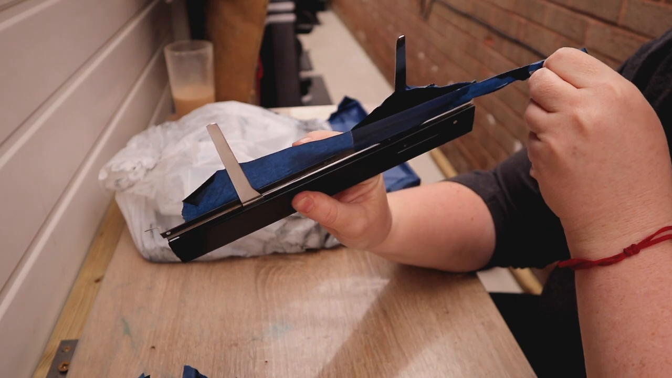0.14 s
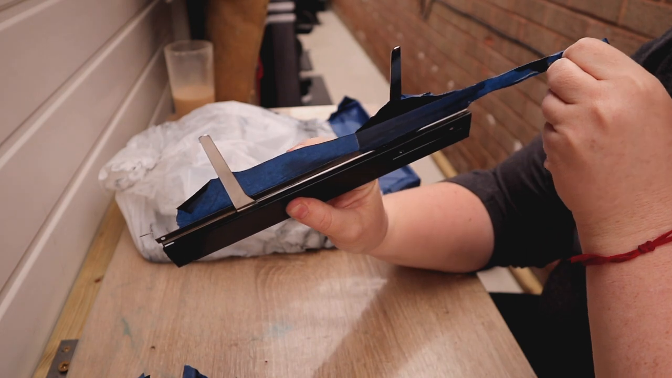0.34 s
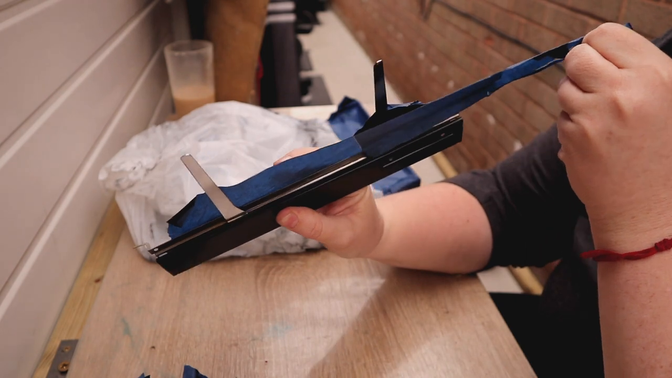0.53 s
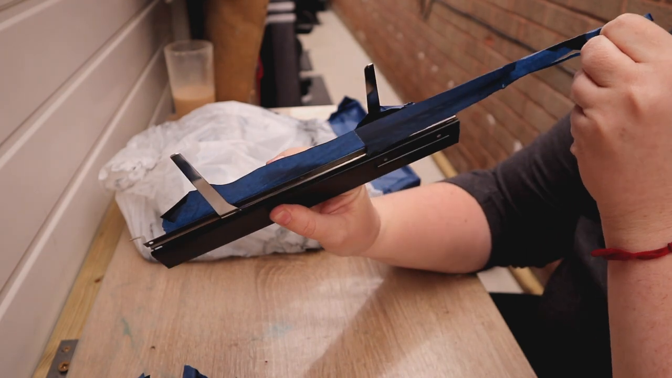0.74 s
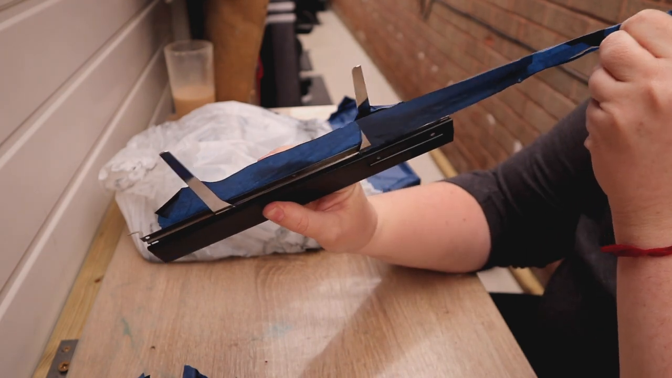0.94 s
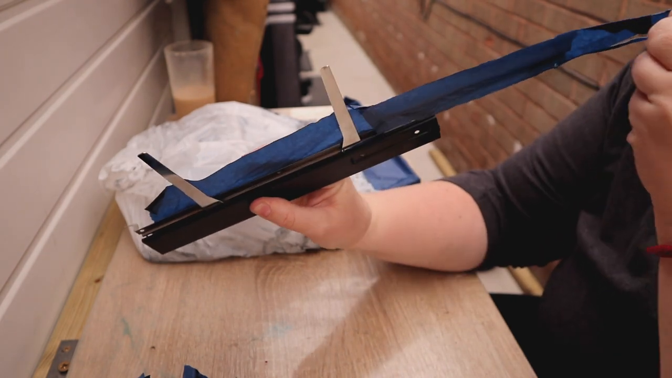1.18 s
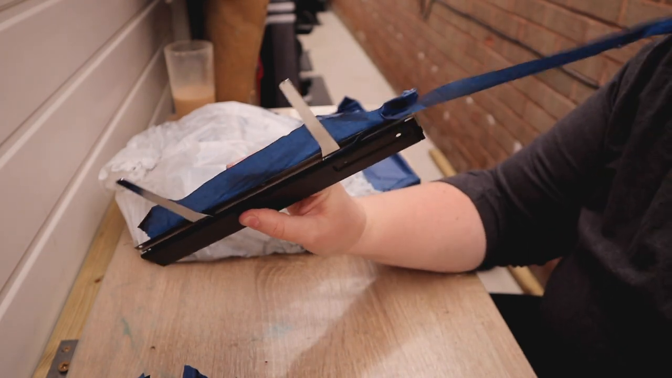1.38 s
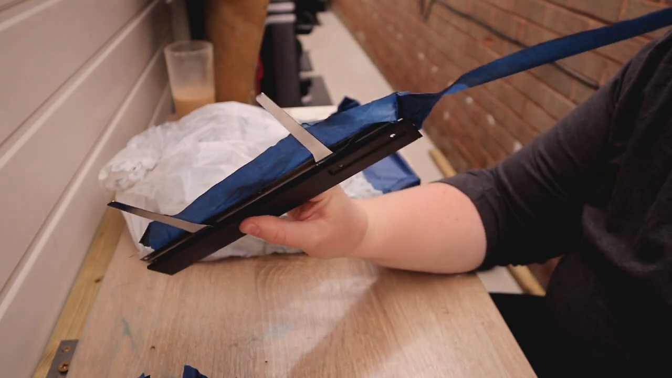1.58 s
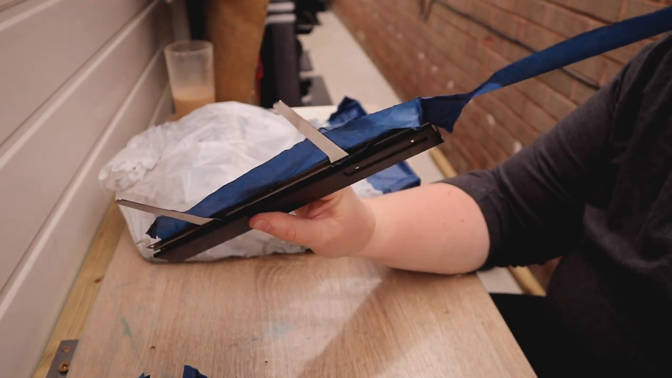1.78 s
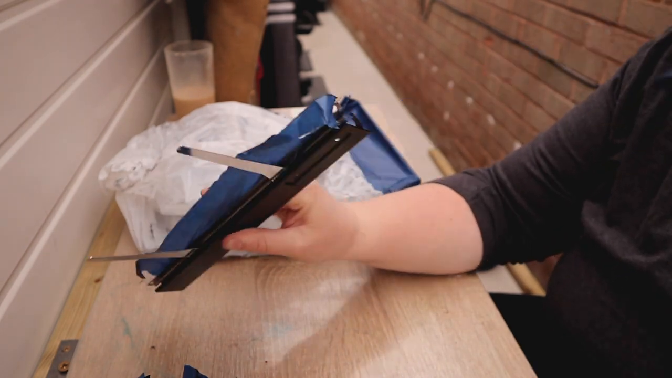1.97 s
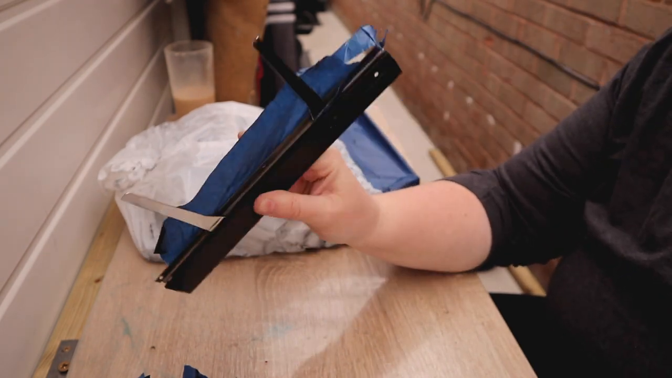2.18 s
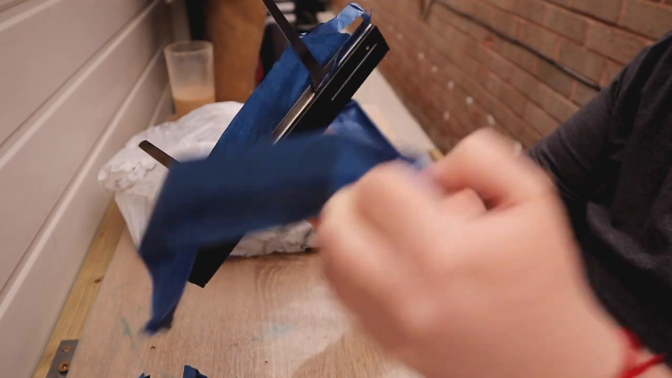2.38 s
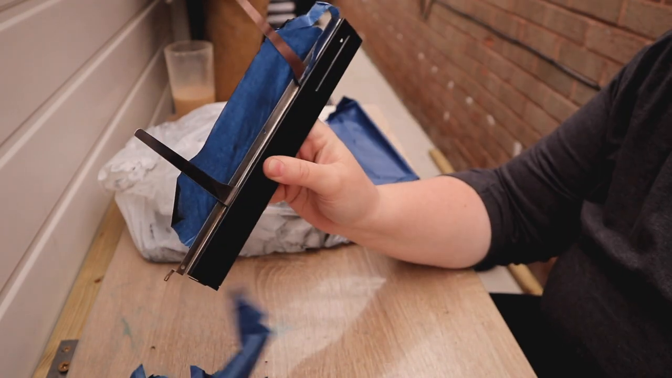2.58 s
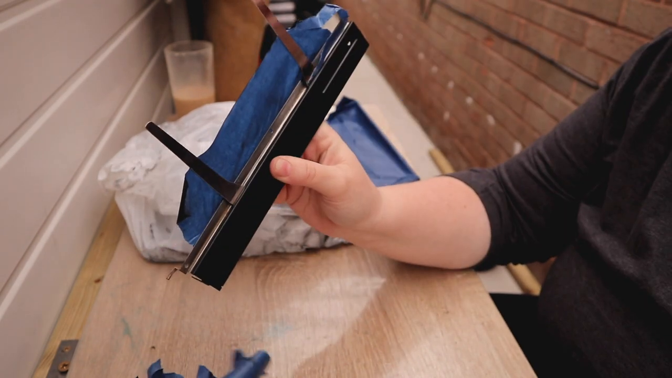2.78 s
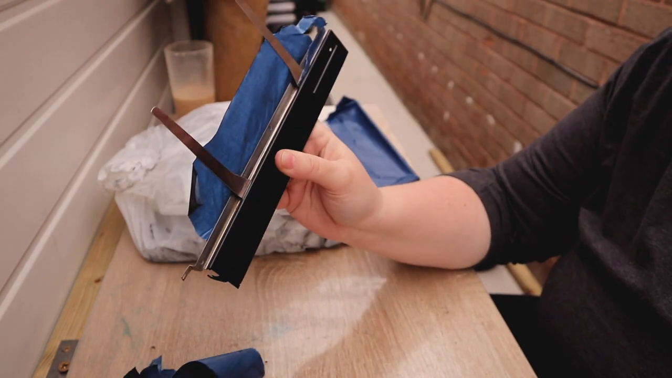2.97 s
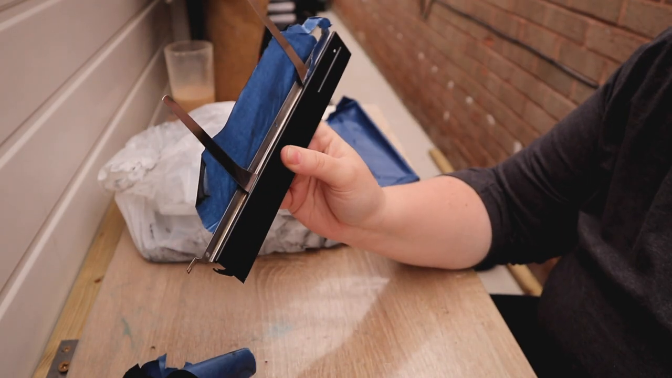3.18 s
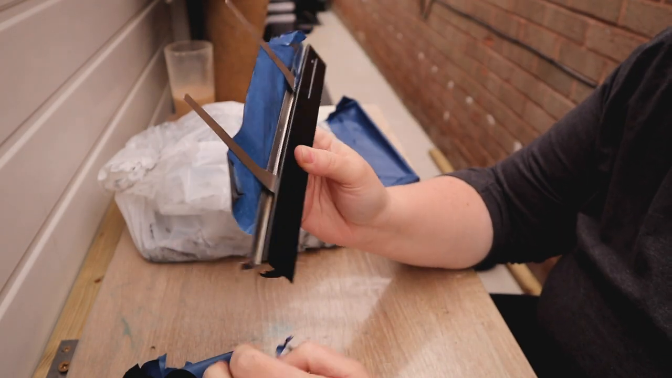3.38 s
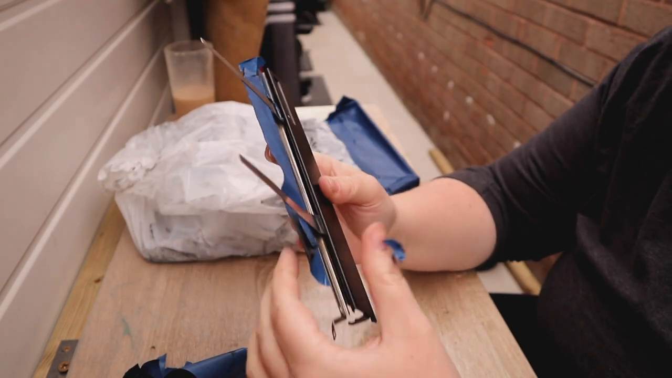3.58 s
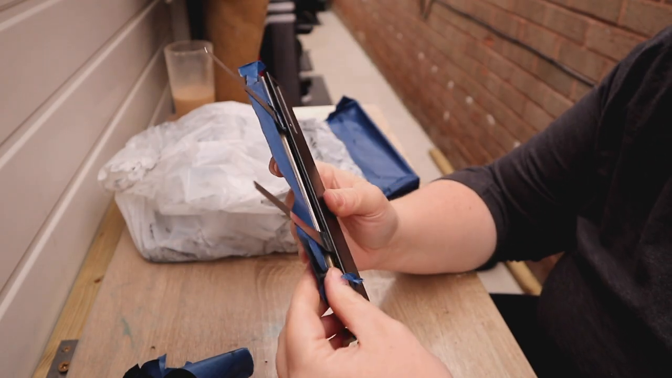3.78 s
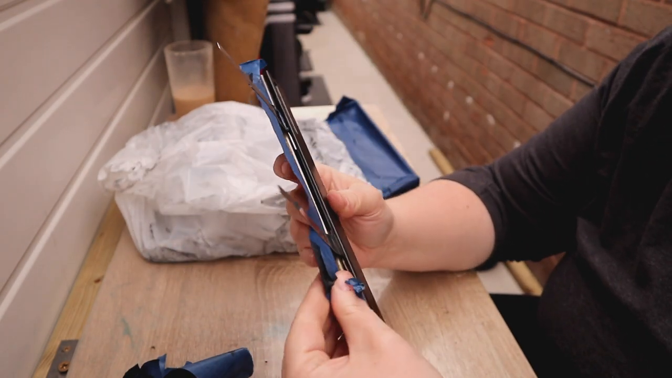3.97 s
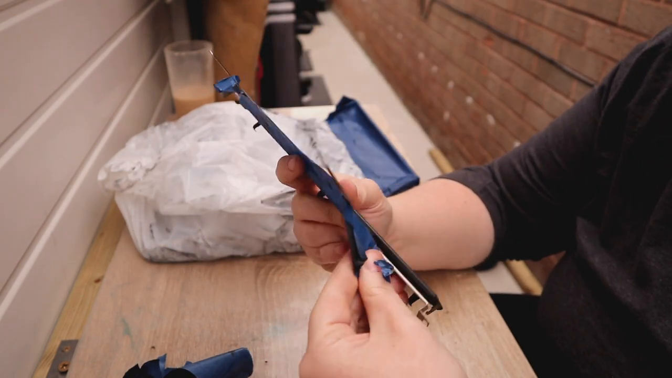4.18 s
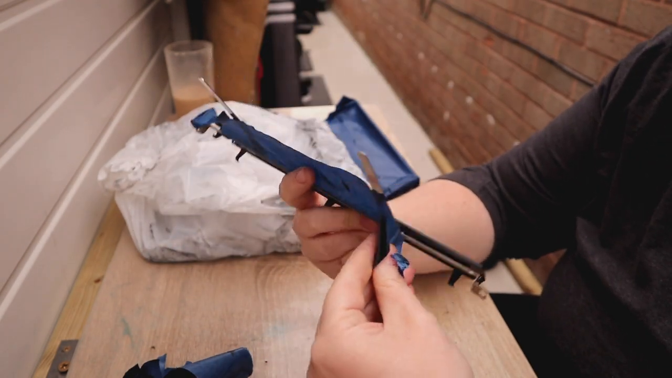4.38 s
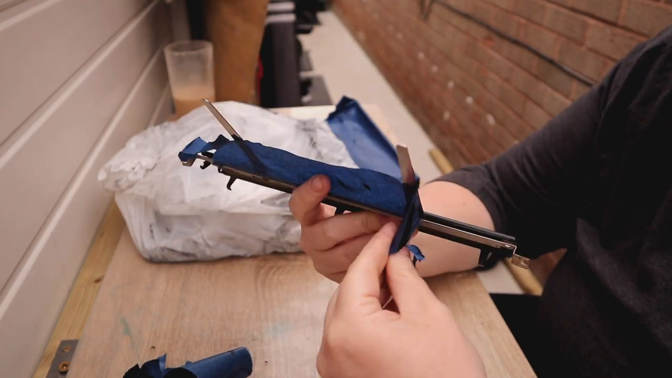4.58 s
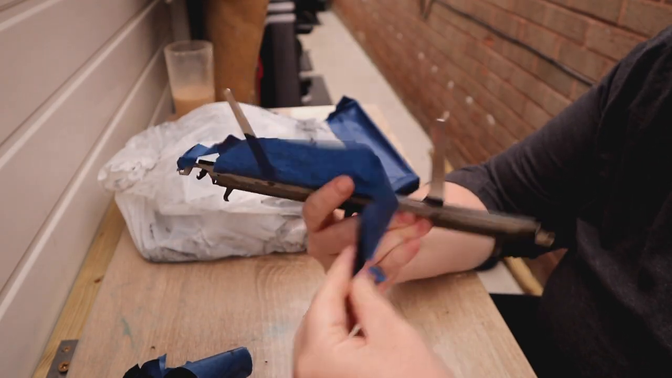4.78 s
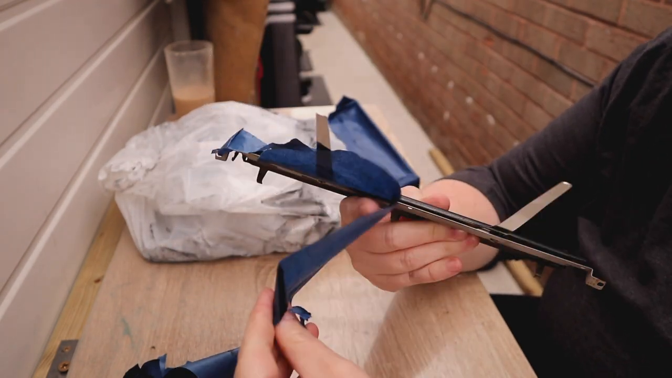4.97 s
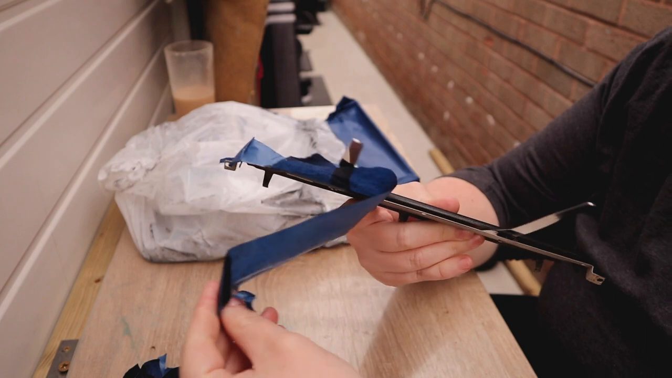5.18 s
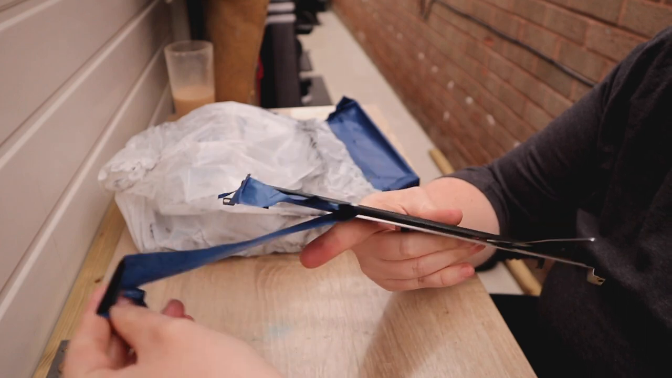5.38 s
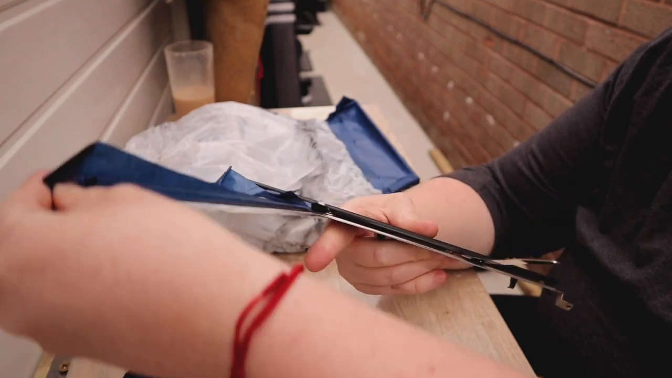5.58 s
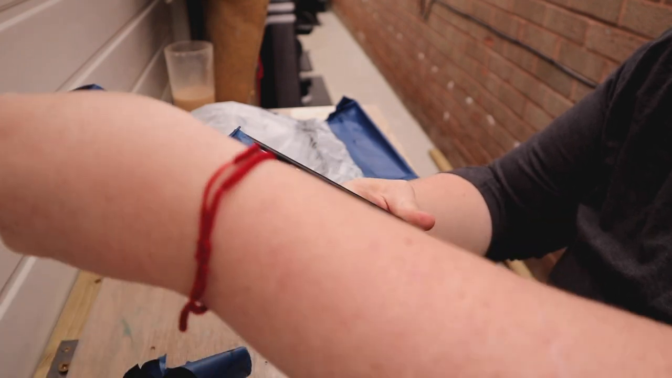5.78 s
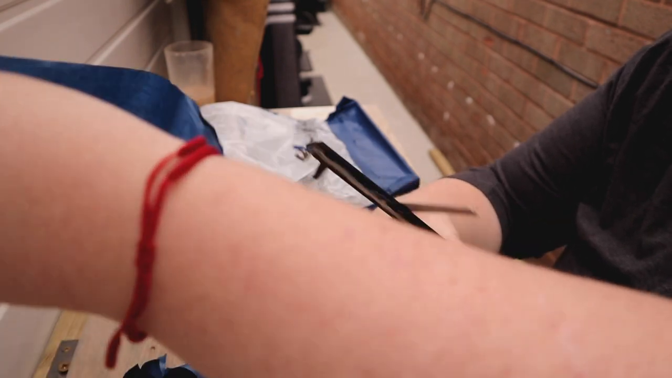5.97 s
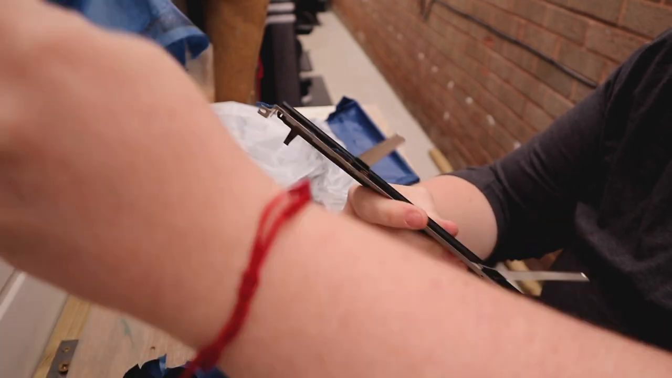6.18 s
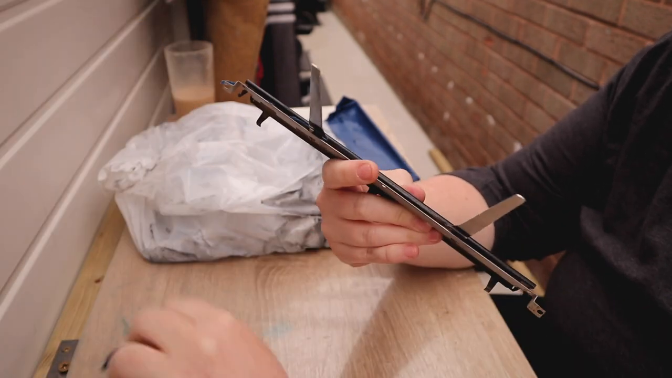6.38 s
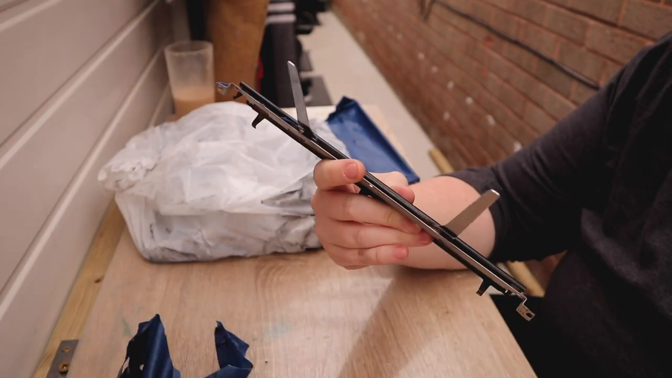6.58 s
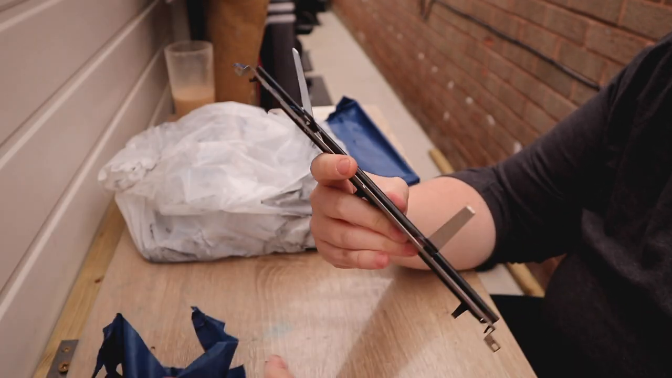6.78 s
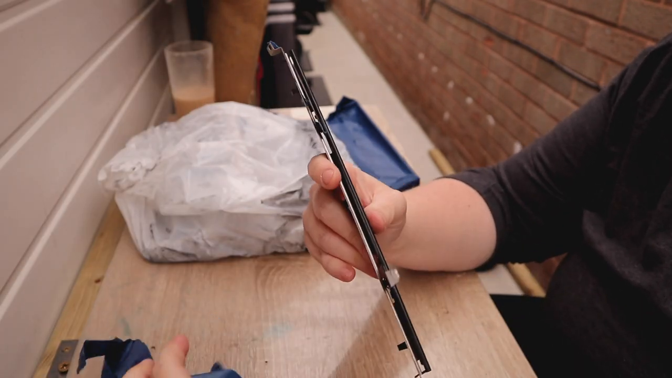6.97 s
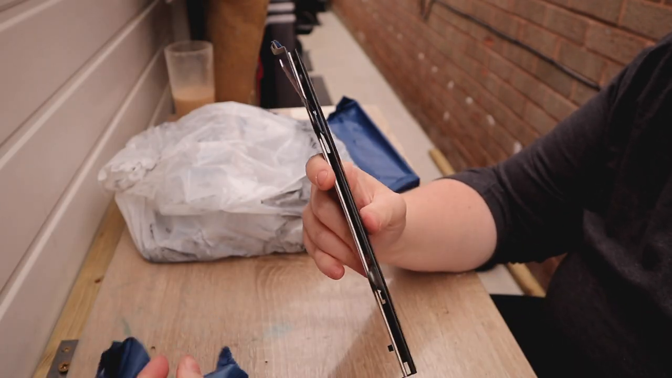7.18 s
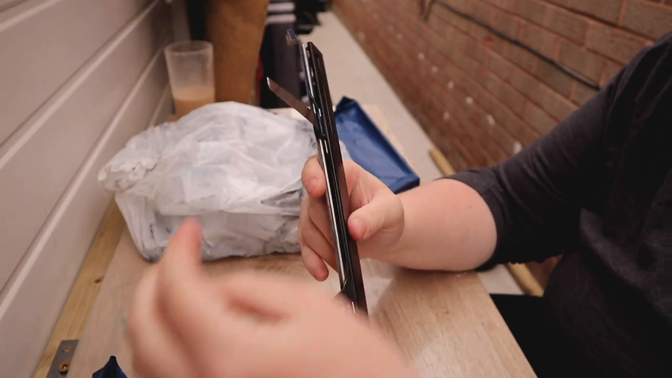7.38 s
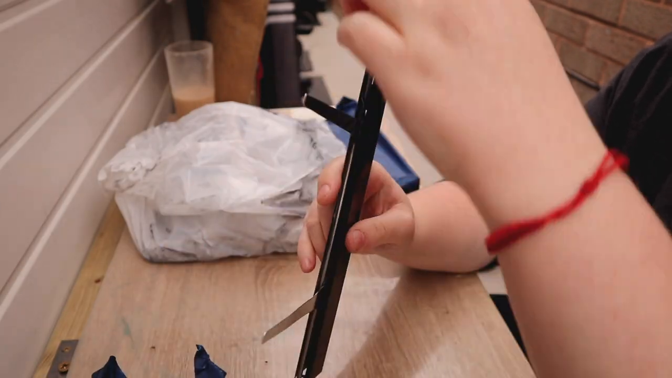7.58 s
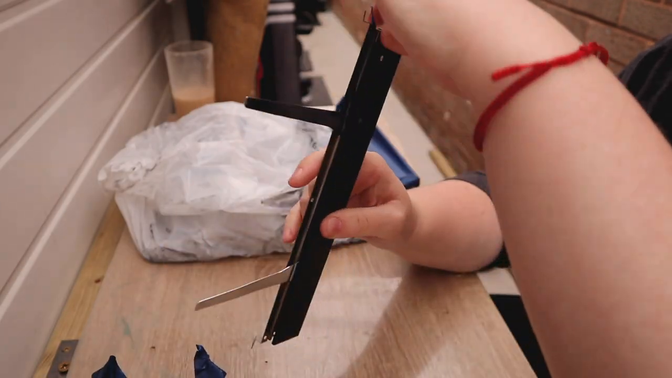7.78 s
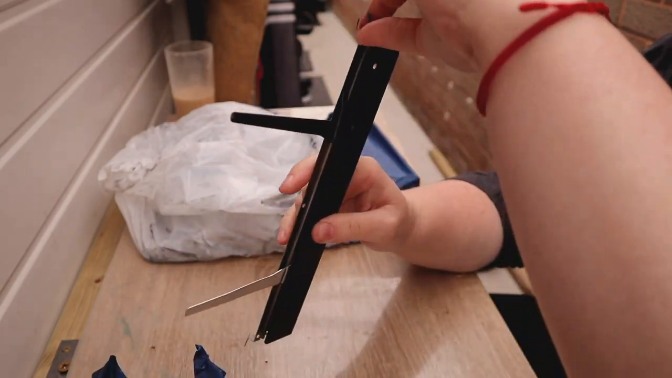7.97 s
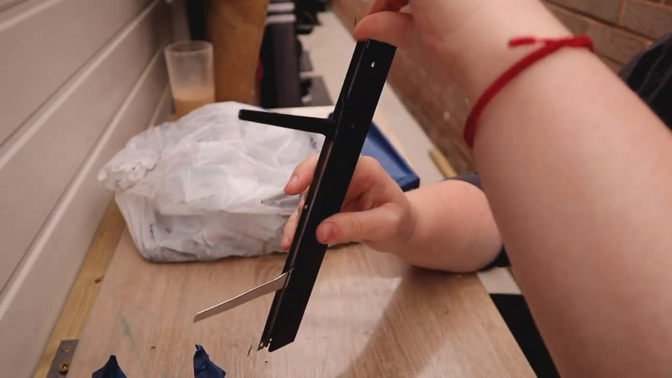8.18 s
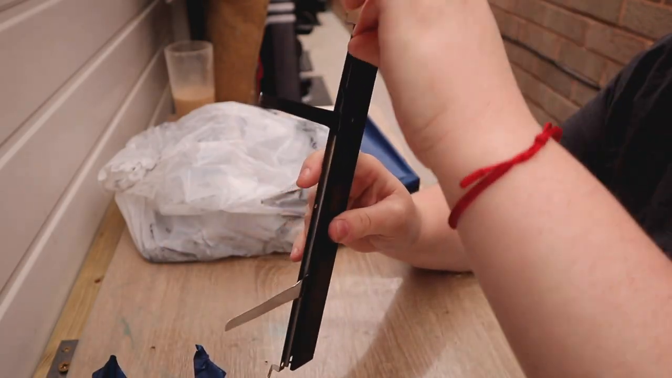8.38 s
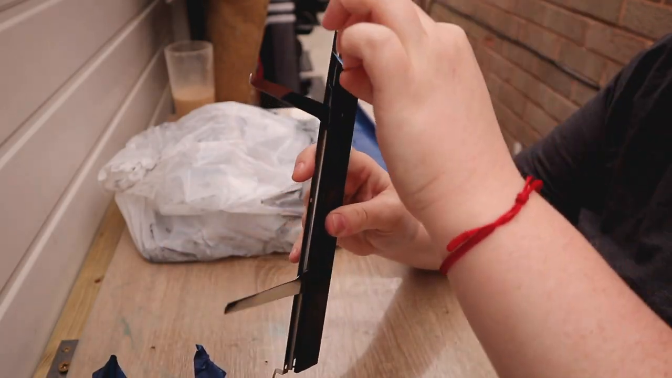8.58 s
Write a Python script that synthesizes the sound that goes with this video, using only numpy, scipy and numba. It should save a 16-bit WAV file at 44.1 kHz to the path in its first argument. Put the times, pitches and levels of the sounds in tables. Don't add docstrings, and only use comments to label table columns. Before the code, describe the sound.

Close-up tape peeling in a narrow outdoor yard, with soft air hiss, low distant traffic and a short reflection from nearby walls. From 0 s a quiet, dense gluey crackle runs steadily, with a small tug near 0.5. At 1.06 a hard snap and rip bursts out, followed by pops and tugs from 1.3 to 1.65 and a sharp rip near 2.0. Uneven crackles and creases continue, busiest around 2.5-3.1, then it quiets. At 3.56 a fingernail pings a thin metal prong, briefly ringing. Peeling resumes at 4.15, sustained and rustling, with a loud rip at 4.85, another pull at 5.2-5.4 and one at 5.9. Fingers knock the part around 6.3, a deep bump loudest. Dense snaps and tearing fill 6.4-7.1, with bright pops near 7.35. Faint sparse crackling follows, with a gentle renewed tug at 8.45 until the end.

```python
import sys
import numpy as np
from scipy import signal
from scipy.fft import rfft, irfft
from scipy.io import wavfile
from scipy.ndimage import uniform_filter1d
from numba import njit

SR = 44100
rng = np.random.default_rng(int(sys.argv[2]) if len(sys.argv) > 2 else 0)


def natural_amplitude(level_db):
    exponent = np.asarray(level_db, float) / 20
    return 10 ** exponent


def master_out(mix):
    frames = np.transpose(np.atleast_2d(mix))
    ceiling = np.clip(frames, -1, 1)
    pcm = np.round(ceiling * 32767).astype(np.int16)
    wavfile.write(sys.argv[1], SR, pcm)


N = 381024
TIME = np.arange(N) / SR
STEP = TIME[::32]


def unit(x):
    return x / np.sqrt(np.mean(x ** 2))


def band(x, lo_hz, hi_hz, order=2):
    return signal.sosfilt(signal.butter(order, [lo_hz, hi_hz], "bandpass", fs=SR, output="sos"), x)


def colour(x, table):
    hz, db = np.transpose(table)
    bins = np.maximum(np.fft.rfftfreq(8192, 1 / SR), 1)
    log_gain = np.interp(np.log(bins), np.log(hz), db) * np.log(10) / 20
    cepstrum = irfft(log_gain)
    cepstrum[1:4096] *= 2
    cepstrum[4097:] = 0
    impulse = irfft(np.exp(rfft(cepstrum)))[:4096]
    return signal.fftconvolve(x, impulse)[:N]


@njit
def svf(x, hz, width):
    y, b, l = np.empty(len(x)), 0., 0.
    for i in range(len(x)):
        g, k = np.tan(np.pi * hz[i] / SR), width / hz[i]
        v = (b + g * (x[i] - l)) / (1 + g * (g + k))
        b, l, y[i] = 2 * v - b, l + 2 * g * v, k * v
    return y


def walk(rate):
    hold = int(SR / rate)
    levels = np.repeat(rng.standard_normal(N // hold + 1), hold)
    return 1.2 * uniform_filter1d(levels, hold)[:N]


def decay(t60, t):
    return natural_amplitude(-60 * t / t60)


def controls(table):
    s, *columns = np.transpose(table)
    return [np.interp(TIME, s, c) for c in columns]


def fade(start, end, edge):
    return np.clip(np.minimum(TIME - start, end - TIME) / edge, 0, 1)


def span(start, end):
    return slice(max(int(start * SR), 0), int(end * SR))


def yard():
    # hz, level_db (per Hz)
    air_colour = [(24, -35), (40, 1.5), (144, -3), (231, -1), (337, -9.5), (402, -8), (1180, -14.5),
                  (1720, -18.5), (13400, -28), (16000, -36)]
    # time_s, level_db
    rumble = [
        (.85, -77),
        (1.2, -61),
        (1.7, -75),
        (2.3, -64),
        (3.6, -82),
        (4.95, -63),
        (5.5, -76),
        (6.8, -60.5),
        (7.4, -77),
        (8.64, -81),
    ]
    # start_s, end_s, pitch_hz, width_hz, level_db
    drones = [(-.2, .85, 117.2, 6.1, -59.5), (.3, 0.997, 60.3, 11, -69), (0.943, 1.502, 153, 7.5, -57.5),
              (1.546, 2.05, 108, 6.1, -60.5), (2.092, 2.348, 64.4, 23.6, -54),
              (6.8, 7.705, 60.7, 5.1, -65.5), (7.698, 8.403, 139.7, 6.9, -75.5),
              (7.9, 8.491, 259, 30, -68.5), (8.196, 8.894, 61.7, 10, -65.5), (4.2, 4.6, 55, 20, -66),
              (1.0, 1.5, 52, 20, -65)]
    noise = rng.standard_normal((3, N))
    air_db = -64.5 + 1.0 + 1.6 * walk(2.41)
    out = natural_amplitude(air_db) * unit(colour(noise[0], air_colour))
    deep_hz = np.full(N, 26.)
    deep = unit(svf(svf(noise[1], deep_hz, 9.), deep_hz, 6.2))
    wobble = walk(4.9)
    for start, end, hz, width, db in drones:
        at = span(start, end)
        tone = np.sin(2 * np.pi * np.cumsum(hz + .15 * width * wobble[at]) / SR)
        rough = unit(svf(noise[2, at] + 0, np.full(len(tone), 1. * hz), 1. * width))
        out[at] += natural_amplitude(db) * fade(start, end, 0.074)[at] * (tone + 0.3 * rough)
    return out + natural_amplitude(controls(rumble)[0] + 6.5) * deep


def walls(x):
    t60_s, level_db = 0.11, -13.5
    t = TIME[:SR // 3]
    noise = rng.standard_normal((2, len(t))) * (t > .003)
    low = band(noise[0], 149, 900) * decay(1.6 * t60_s, t)
    high = band(noise[1], 900, 11600) * decay(t60_s, t)
    tail = low + high
    return natural_amplitude(level_db) * signal.fftconvolve(x, tail / np.sqrt(np.sum(tail ** 2)))[:N]


def knocks():
    # start_s, level_db, pitch_hz
    bumps = [
        (3.078, -45.5, 460),
        (4.586, -46, 404),
        (6.159, -44, 810),
        (6.3, -34.5, 296),
        (6.353, -41, 795),
        (7.107, -47.5, 1010),
    ]
    out, t = np.zeros(N + 2048), TIME[:2048]
    for s, db, hz in bumps:
        knock = np.sin(2 * np.pi * hz * t) + 2.3 * band(rng.standard_normal(len(t)), 300, 2500)
        out[int(s * SR):int(s * SR) + len(t)] += natural_amplitude(db) * knock * decay(0.033, t)
    return out[:N]


def prong():
    # pitch_hz, level_db, t60_s
    modes = [(1821, -7, .26), (4226, 6, .065), (4236, -17, .25), (9658, -20, .1), (5895, -11, .15),
             (6772, -14, .07), (12290, -15, .1), (1250, -9, .06), (980, -11, .05)]
    level_db = -35.5
    s = round(3.563 * SR) / SR
    t = TIME[:SR // 2]
    ring = sum(natural_amplitude(db) * np.sin(2 * np.pi * hz * t) * decay(t60, t) for hz, db, t60 in modes)
    ring = np.interp(TIME - s, t, ring * np.minimum(t / 0.0015, 1), 0, 0)
    nail = rng.standard_normal(N) * (TIME > s) * decay(0.045, np.maximum(TIME - s, 0))
    ring = ring * (1 + .7 * band(nail, 30, 400))
    return natural_amplitude(level_db) * (natural_amplitude(-6) * ring + 1.3 * band(nail, 600, 6000))


def snaps():
    # start_s, peak_db, ring_hz, thump_db
    cracks = [(0.4897, -19.5, 6440, -39), (1.0625, -10, 7600, -27), (1.1612, -28, 5600, -26),
              (1.3049, -27, 5840, -27), (1.6067, -12, 8800, -39), (1.6254, -21, 7500, -22),
              (1.7983, -31, 7500, -33), (2.5659, -22, 3760, -21.5), (2.603, -19, 5900, -21),
              (3.0582, -22, 3670, -37), (3.0995, -11.5, 3980, -32), (4.1577, -29, 5200, -32),
              (4.8446, -7.5, 5730, -24), (5.4149, -11, 4640, -13), (6.478, -18.5, 4030, -14),
              (7.4865, -26, 5200, -46), (7.5481, -25, 6100, -20), (1.81, -32, 8200, -35),
              (8.0576, -42, 3390, -30)]
    # start_s, peak_db, ring_hz, thump_db
    muffled = [(1.4645, -12, 5770, -22), (1.5329, -22.5, 5800, -15), (1.5475, -20.5, 8700, -11),
               (1.982, -7.5, 8200, -23.5), (1.9934, -15, 8440, -25), (2.5497, -21, 4200, -26),
               (2.838, -12, 3180, -27), (2.8644, -24, 3230, -32), (3.1084, -11.5, 6970, -30),
               (3.1266, -19.5, 4100, -18), (3.2366, -31, 3840, -23), (3.8107, -36, 4600, -14),
               (4.8645, -7, 5600, -40), (5.217, -23.5, 8510, -19), (5.6288, -29.5, 4500, -12),
               (5.9168, -8.5, 7950, -19), (6.1953, -33, 6270, -11), (6.4276, -20, 4150, -18.5),
               (6.5108, -14.5, 3360, -11), (6.5458, -15, 6600, -23), (6.6314, -14, 3100, -21),
               (6.6696, -23, 4300, -26), (6.7247, -12.5, 6000, -23.5), (6.8185, -28, 3780, -22.5),
               (6.8632, -20, 8400, -23), (6.9833, -21.5, 4130, -35), (7.2442, -33.5, 4400, -22),
               (7.3316, -12.5, 4600, -23), (7.3548, -7.5, 5780, -47), (7.8358, -27.5, 5750, -35)]
    # start_s, peak_db, ring_hz
    crackles = [(0.4753, -29, 5500), (1.1764, -33, 8560), (1.2032, -29, 8300), (1.2421, -32, 8340),
                (1.3359, -25, 5740), (1.5594, -20, 7900), (1.9535, -26, 8300), (2.369, -34, 3400),
                (2.4394, -35, 7500), (2.5411, -25, 3380), (2.6224, -22, 3840), (2.8135, -27, 3620),
                (3.0116, -23.5, 6600), (3.0373, -23, 5130), (3.273, -45, 3060), (3.2914, -41, 5850),
                (3.5364, -43, 4140), (4.1118, -43, 6660), (5.1677, -31, 7650), (5.1916, -28, 7500),
                (6.5808, -21, 7000), (6.6195, -28, 3140), (6.7578, -23, 3060), (6.8523, -28, 5000),
                (6.9516, -35, 4800), (7.0294, -30, 4260), (7.0525, -30, 5500), (7.23, -36, 4330),
                (7.3754, -27, 3330), (7.6944, -49, 3350), (1.252, -34, 8500), (1.757, -43, 7000),
                (1.768, -45, 7200), (1.78, -44, 7400), (1.912, -38, 7400), (1.931, -35, 7000),
                (1.946, -34, 7600), (1.962, -28, 8400), (2.5225, -41, 4920), (2.5844, -27, 6020),
                (2.6164, -24, 3390), (2.7974, -34, 6500), (3.0624, -26, 6500), (3.0714, -30, 6000),
                (3.1864, -38, 7190), (4.044, -50, 8300), (4.1752, -27, 4300), (4.356, -33, 6300),
                (4.8675, -5, 5700), (5.355, -26, 7400), (5.605, -38, 8000), (5.7, -43, 8300),
                (6.2245, -35, 4630), (6.5024, -22, 5500), (6.5324, -20, 6000), (6.5574, -22, 3470),
                (6.7364, -15, 7190), (6.8454, -30, 4500), (6.8744, -24, 3390), (6.9294, -36, 5160)]
    rows = [(*row, -5) for row in cracks] + [(*row, -24) for row in muffled]
    rows += [(*row, -32, -17) for row in crackles]
    out, t = np.zeros(N + 2048), TIME[:2048]
    chance = rng.standard_normal((len(rows), 3, len(t)))
    for (s, db, hz, thump_db, air_db), (spray, thump, air) in zip(rows, chance):
        second_hz = hz * (.55 if hz > 4500 else 1.7)
        ring = np.sin(2 * np.pi * hz * t) + 0.37 * np.sin(2 * np.pi * second_hz * t)
        pop = 0.53 * ring * np.minimum(t / 0.00024, 1) * decay(0.0055, t)
        spray_fall = 0.9 * decay(0.013, t) + 0.2 * decay(0.04, t)
        pop += 0.41 * band(spray, .5 * hz, min(1.9 * hz, 9500)) * spray_fall
        pop += natural_amplitude(thump_db + 13) * band(thump * decay(0.018, t), 300, 1610)
        pop += natural_amplitude(air_db + 0.3) * band(air * decay(0.0045, t), 10000, 16500)
        out[int(s * SR):int(s * SR) + len(t)] += natural_amplitude(db + 0.5) * pop
    return out[:N]


def swell(s, db, rise, hold, fall):
    drop_db = 20 * np.maximum((s - STEP) / rise, np.maximum(STEP - s - hold, 0) / fall)
    return natural_amplitude(2 * np.maximum(db - drop_db, -120))


def pull():
    # time_s, level_db
    creep = [(0, -51.5), (.44, -49), (1.1, -49), (1.3, -54), (1.5, -70), (3.1, -68), (3.3, -85), (4.1, -90),
             (5.2, -66), (5.44, -49), (5.75, -60), (6.15, -60), (6.4, -48.5), (6.8, -47), (7.2, -76),
             (7.4, -62), (7.9, -75), (8.64, -58)]
    # peak_s, level_db, build_s (per 20 dB), release_s (per 20 dB)
    tugs = [(.498, -44, .2, .5), (1.033, -36, .06, .13), (1.36, -40, .15, .2), (1.428, -29.5, .05, .12),
            (1.807, -63, .3, .15), (2.0, -42, .13, .13), (2.094, -46.5, .08, .05), (2.216, -52, .045, .06),
            (2.3, -48.5, .07, .1), (2.42, -52.5, .3, .1), (2.547, -45, .04, .05), (2.64, -40, .08, .2),
            (2.843, -50, .8, .2), (2.934, -44.5, .06, .1), (3.036, -41.5, .15, .2), (3.12, -48, .1, .14),
            (3.569, -62, .035, .11), (3.744, -53.5, .045, .085), (4.187, -35, .028, .03),
            (4.2, -43, .11, .3), (4.419, -39.5, .16, .14), (4.83, -43.5, .6, .05), (5.245, -36, .09, .2),
            (5.403, -37, .25, .03), (5.9, -45, .22, .05), (6.297, -41.5, .17, .11),
            (6.638, -44.5, .06, .13), (6.738, -36.5, .11, .03), (7.029, -46.5, .24, .09),
            (7.127, -49.5, .14, .06), (8.445, -53.5, .07, .08)]
    # full_s (full level reached), level_db, hold_s, release_s (per 20 dB)
    rips = [(1.0625, -24, .003, .017), (1.54, -36, .085, .045), (1.98, -26, .014, .012),
            (2.568, -34.5, .004, .02), (2.599, -35, .004, .015), (2.617, -33.5, .007, .02),
            (2.816, -40, .004, .015), (3.036, -39, .005, .015), (4.853, -23, .06, .065),
            (5.04, -44, .01, .04), (5.417, -23, .001, .016), (5.92, -23.5, .038, .015),
            (5.974, -30, .008, .033), (6.138, -40, .016, .03), (6.481, -33, .008, .04),
            (6.516, -30, .03, .07), (6.869, -39.5, .001, .08), (7.241, -64, .005, .05),
            (7.342, -45, .001, .1), (7.77, -64, .07, .06), (7.934, -57.5, .06, .05), (8.06, -63, .06, .1),
            (1.76, -60, .08, .05)]
    # start_s, end_s, dip_db
    sticks = [(1.485, 1.534, -6), (2.238, 2.258, -5), (2.322, 2.342, -4), (2.374, 2.388, -5),
              (2.468, 2.521, -8), (2.898, 2.923, -5), (2.948, 2.976, -4), (3.205, 3.232, -6),
              (4.163, 4.173, -6), (4.28, 4.325, -4), (4.515, 4.57, -3), (5.08, 5.13, -3),
              (6.165, 6.192, -5), (6.328, 6.35, -5), (6.648, 6.668, -4), (6.834, 6.845, -7),
              (6.915, 6.928, -6), (6.992, 7.008, -7), (7.06, 7.09, -4), (7.885, 7.92, -4), (8.01, 8.05, -4),
              (8.14, 8.24, -5), (8.35, 8.38, -3), (1.83, 1.9, -4), (1.963, 1.977, -10)]
    rip_attack_s = .017
    power = natural_amplitude(2 * np.interp(STEP, *np.transpose(creep)))
    power = power + sum(swell(s, db, rise, 0, fall) for s, db, rise, fall in tugs)
    power = power + sum(swell(s, db, rip_attack_s, hold, fall) for s, db, hold, fall in rips)
    held_db = sum(db * fade(start, end, .004) for start, end, db in sticks)
    return np.interp(TIME, STEP, 10 * np.log10(power)) + held_db


def threads(level_db, spread_db=4.5, stutter_db=1.9):
    jerk = np.clip((level_db + 64) / 18, .3, 1.)
    sizes_db = spread_db * np.minimum(rng.exponential(size=N), 4)
    return natural_amplitude(sizes_db + jerk * (stutter_db * walk(140) + .4 * walk(40)))


def folds(ticks):
    level_db, patchy_db, width = -18.5, 4.5, .035
    out = 0
    for hz in np.geomspace(3000, 8800, num=8):
        gain = natural_amplitude(patchy_db * walk(12))
        out = out + gain * unit(svf(ticks, hz * (1 + .06 * walk(3)), width * hz))
    return natural_amplitude(level_db) * out


def rings(ticks):
    # start_s, end_s, pitch_hz, level_db
    free_modes = [(.1, 1.45, 8650, -15), (1.29, 1.4, 5800, -12), (1.975, 1.995, 1410, -9),
                  (4.36, 4.5, 4370, -11), (4.2, 4.5, 6600, -9), (4.34, 4.5, 3220, -8),
                  (4.6, 4.83, 6960, -11), (4.66, 4.83, 2610, -13), (4.6, 4.83, 4340, -11),
                  (4.84, 4.89, 5750, -4), (4.88, 4.92, 1730, -10), (5.15, 5.31, 5870, -6),
                  (5.17, 5.37, 7230, -4), (5.17, 5.29, 8530, -7), (5.15, 5.4, 2410, -9),
                  (5.3, 5.43, 8100, -7), (5.35, 5.43, 4200, -7), (4.84, 4.89, 3270, -5),
                  (5.935, 5.96, 4700, -6), (5.91, 5.95, 1080, -9), (5.91, 5.96, 8020, -8),
                  (5.97, 6.0, 6400, -6), (7.92, 8.0, 7240, -5), (8.0, 8.13, 6330, -6),
                  (8.5, 8.64, 6390, -9), (8.5, 8.64, 6890, -7), (8.43, 8.64, 3080, -8),
                  (8.38, 8.52, 5430, -9), (8.4, 8.5, 7920, -5), (1.99, 2.05, 8600, -6),
                  (4.89, 4.94, 3700, -7), (1.0, 1.09, 160, -13), (1.0, 1.08, 330, -9),
                  (1.41, 1.47, 150, -15), (2.83, 2.88, 350, -14), (2.8, 2.9, 750, -14),
                  (4.9, 4.95, 1150, -9), (4.835, 4.875, 1020, -9), (6.5, 6.57, 1100, -9),
                  (.72, 1.0, 1200, -12), (8.42, 8.49, 8570, -8), (4.35, 4.49, 2500, -10),
                  (5.2, 5.4, 1750, -11), (5.41, 5.45, 210, -14)]
    out, drift, flicker_db = np.zeros(N), 1 + walk(8) / 120, 3.5 * walk(45)
    for start, end, hz, db in free_modes:
        at = span(start, end)
        own_db = db - 1 + np.roll(flicker_db, 20 * hz)[at]
        mode = unit(svf(ticks[at] + 0, hz * drift[at], 100.))
        out[at] += natural_amplitude(own_db) * fade(start, end, .012)[at] * mode
    return out


def rustles(ticks):
    # start_s, end_s, centre_hz, level_db
    loose_folds = [(1.05, 1.075, 2600, 0), (4.172, 4.2, 2600, -1), (6.275, 6.31, 2800, 0),
                   (1.28, 1.36, 6500, -1), (1.41, 1.47, 3400, -3), (1.53, 1.6, 7800, 0),
                   (1.62, 1.7, 7200, 2), (1.72, 1.85, 7400, 3), (1.9, 1.975, 7600, 3), (2.0, 2.06, 6500, 0),
                   (2.07, 2.11, 1500, 0), (2.2, 2.235, 7200, 5), (2.26, 2.32, 3300, 0),
                   (2.28, 2.36, 7000, 0), (2.345, 2.37, 9000, 2), (2.39, 2.41, 3400, 2),
                   (2.418, 2.435, 4400, 5), (2.488, 2.5, 3500, 6), (2.6, 2.7, 3100, -2),
                   (2.64, 2.7, 8800, -2), (2.8, 2.9, 3400, 0), (2.98, 3.03, 3300, 0), (3.0, 3.06, 6000, 0),
                   (3.62, 3.655, 8000, 4), (3.895, 3.915, 6500, 4), (4.17, 4.28, 8700, 1),
                   (4.2, 4.36, 6000, 0), (4.35, 4.49, 3100, -1), (4.56, 4.83, 6200, -1),
                   (4.63, 4.83, 2400, -3), (4.6, 4.83, 9100, -4), (5.03, 5.07, 6000, 2),
                   (5.15, 5.4, 2300, -2), (5.5, 5.61, 8200, 1), (5.5, 5.6, 4600, -1), (5.79, 5.9, 3600, -3),
                   (5.92, 5.96, 5300, 0), (5.98, 6.09, 5500, 1), (6.125, 6.16, 8000, 1),
                   (6.22, 6.29, 5200, 2), (6.24, 6.33, 8400, -1), (6.38, 6.43, 3800, 1),
                   (6.5, 6.58, 2300, -3), (7.36, 7.45, 4600, 3), (4.84, 4.875, 2400, -3),
                   (6.81, 6.835, 12500, -2), (6.955, 6.99, 14000, -2), (7.008, 7.04, 11000, 0),
                   (7.04, 7.17, 3700, 0), (7.92, 8.0, 3500, -1), (8.0, 8.14, 8600, 1),
                   (8.24, 8.34, 7500, 2), (8.5, 8.64, 8800, -2)]
    out, taken = np.zeros(N), np.ones(N)
    for start, end, hz, db in loose_folds:
        at = span(start, end)
        gain = natural_amplitude(db) * fade(start, end, .009)[at]
        centre = np.full(len(gain), 1. * hz)
        width = 900 + .3 * hz
        out[at] += gain * unit(svf(svf(ticks[at] + 0, centre, width), centre, width))
        taken[at] += gain ** 2
    return out, 1 / np.sqrt(taken)


def peel():
    # hz, level_db (per Hz)
    paper_colour = [(1000, -41), (1700, -5.5), (2120, -6), (3340, -5), (5090, -4.5), (5650, -1), (6850, -3),
                    (8820, -2), (10000, -10), (13000, -37.5), (22000, -120)]
    # time_s, resonance_hz, slack (0-1), tension (0-1), facing the microphone (0-1)
    free_strip = [(0, 2600, .95, .7, .7), (.55, 2800, .9, .65, .55), (.95, 2700, .58, .55, .45),
                  (1.3, 3360, .55, .62, .7), (1.85, 4000, .45, .0, .65), (2.09, 2100, .85, .95, .4),
                  (2.25, 2900, .25, .5, .4), (2.6, 3750, .55, .7, .58), (3.12, 3900, .4, .7, .3),
                  (3.78, 2020, .75, .8, .6), (4.12, 2400, .2, .1, .6), (4.4, 3320, .42, .8, .65),
                  (4.6, 4350, .4, .3, .4), (4.88, 2200, .38, .8, .82), (5.36, 2400, .55, .85, .55),
                  (5.5, 4200, .55, .3, .5), (6.4, 3200, .45, .75, .5), (8.64, 3300, .6, .5, .45)]
    level_db = pull()
    strip_hz, slack, tension, facing = controls(free_strip)
    boom_db = -30 + 30 * slack
    strip_db = -35 + 36 * tension
    effort_db = np.maximum(level_db, -60) + 45
    slope_db_s = uniform_filter1d(np.gradient(level_db) * SR, size=800)
    easing = np.clip(-slope_db_s / 250, 0, 1)
    body_db = -4 * easing - 18.5 + 12 * slack + .18 * effort_db
    bright_db = -7 * easing - 17.5 + 21 * facing - .1 * effort_db

    ticks = threads(level_db) * rng.standard_normal((6, N))
    paper = unit(colour(ticks[0], paper_colour))
    strip = natural_amplitude(strip_db) * unit(svf(ticks[1], strip_hz, 600.))
    metal = rings(ticks[2])
    bright = natural_amplitude(bright_db + .9 * walk(25)) * unit(band(ticks[3], 10800, 15250, order=3))
    body = natural_amplitude(body_db + 2.1 * walk(25)) * unit(band(ticks[4], 700, 1650))
    flap = unit(band(ticks[5], 179, 438, order=3)) + 0.45 * unit(band(ticks[5], 41, 170))
    rustle, share = rustles(ticks[5])
    tape = share * (paper + folds(ticks[2]) + rustle + strip + body)
    return natural_amplitude(level_db - 2.5) * (tape + bright + metal + natural_amplitude(boom_db) * flap)


def scene():
    hands = peel() + snaps() + knocks() + prong()
    return (hands + walls(hands) + yard())[None]


def low_pass(x):
    return signal.sosfilt(signal.butter(12, 16980, fs=SR, output="sos"), x)


def record(dry):
    rounded = .5 * np.tanh(2 * dry)
    cut = signal.sosfilt(signal.ellip(8, .2, 60, 15900, fs=SR, output="sos"), rounded)
    return low_pass(cut)


dry = scene()
out = record(dry)
master_out(out)
```